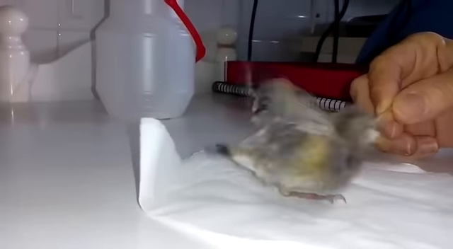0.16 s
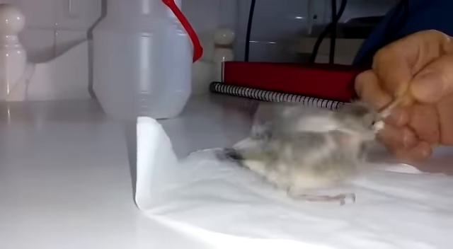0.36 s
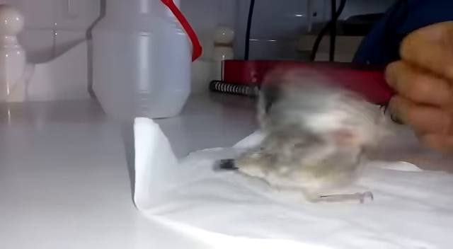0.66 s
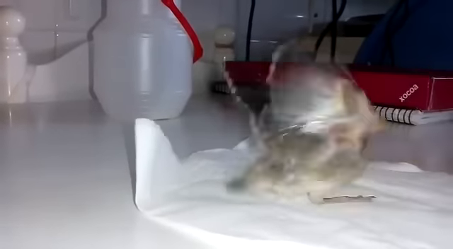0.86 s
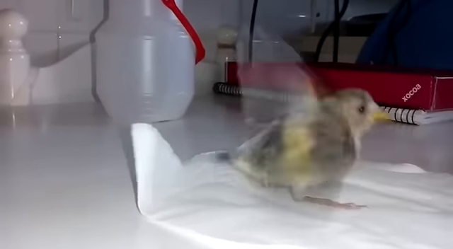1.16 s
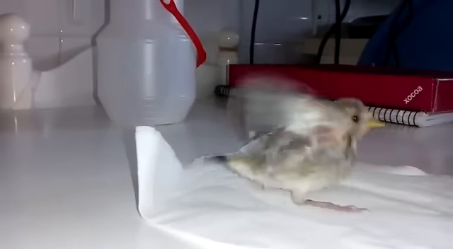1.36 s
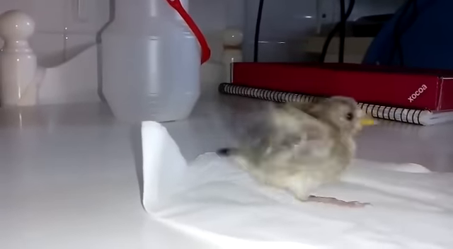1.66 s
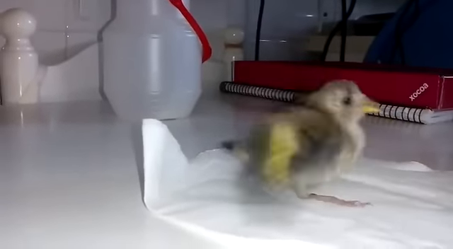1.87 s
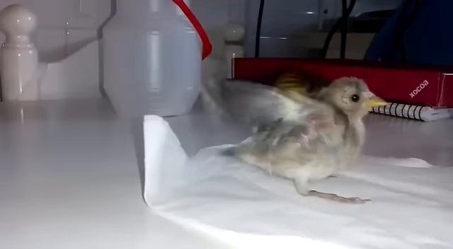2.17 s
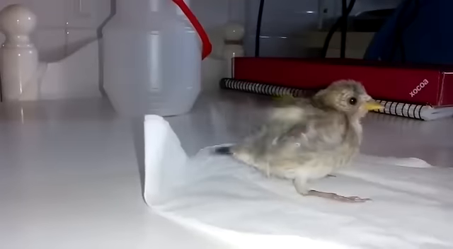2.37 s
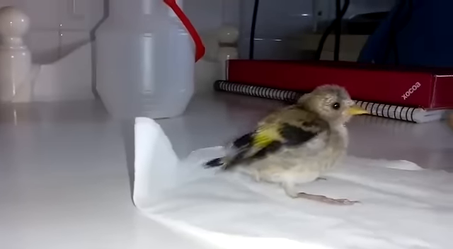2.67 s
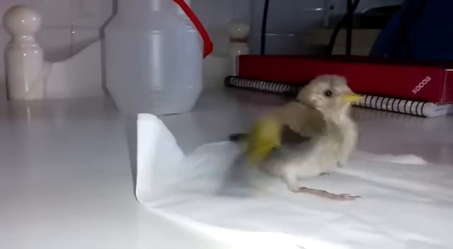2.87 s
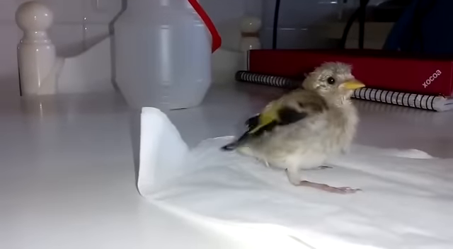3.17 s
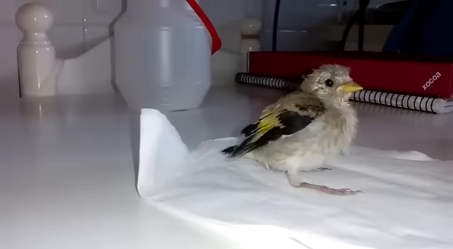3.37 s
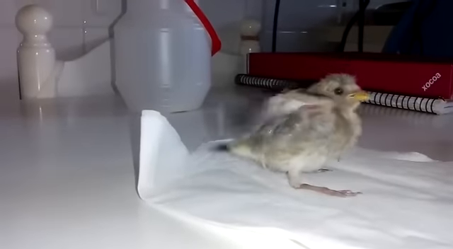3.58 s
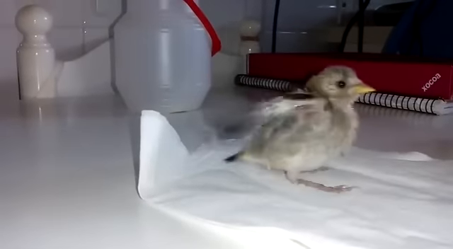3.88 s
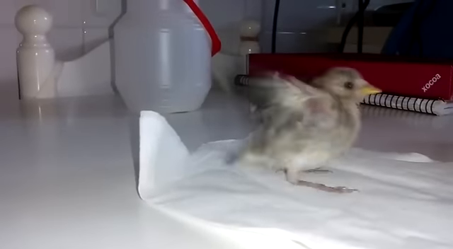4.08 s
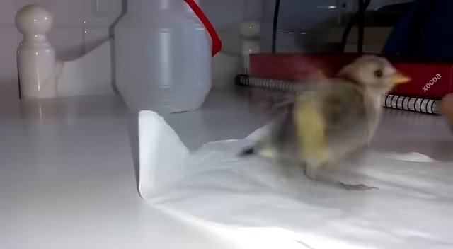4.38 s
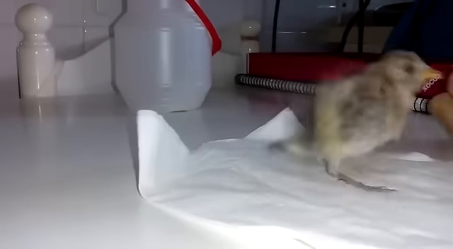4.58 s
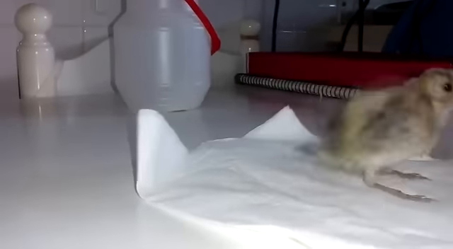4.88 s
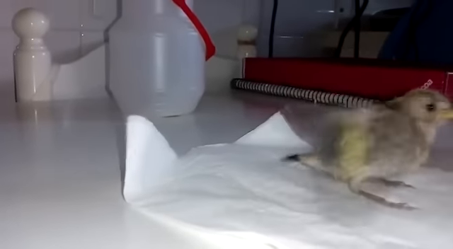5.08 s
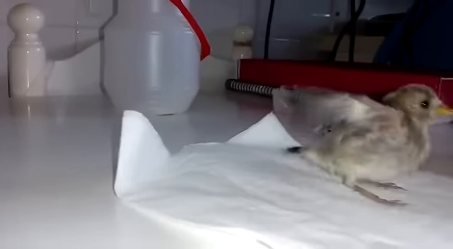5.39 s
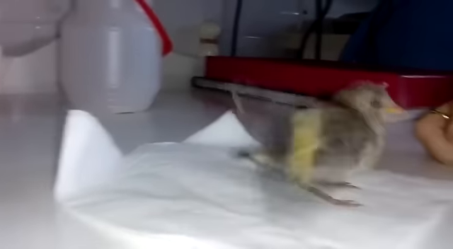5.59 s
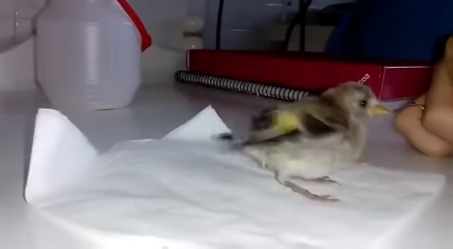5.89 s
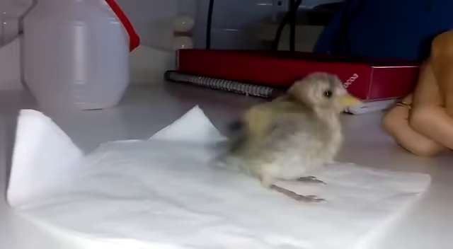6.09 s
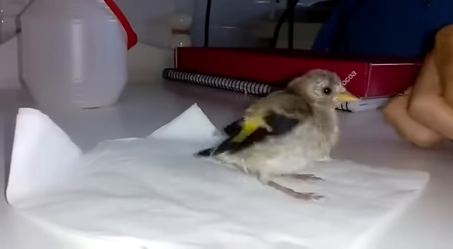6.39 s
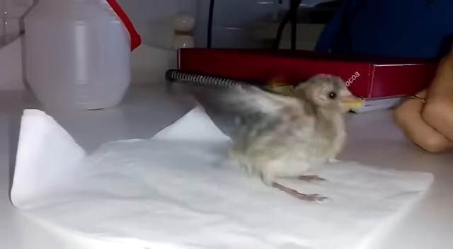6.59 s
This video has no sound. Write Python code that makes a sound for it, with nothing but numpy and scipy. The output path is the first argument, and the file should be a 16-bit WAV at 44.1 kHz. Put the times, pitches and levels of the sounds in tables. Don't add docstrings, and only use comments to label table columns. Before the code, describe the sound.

Steady soft air hum in a small bare room, with a young bird chirping loudly and very near. After an opening chirp fragment and a quiet stretch with light paper taps, bright split-second whistles come about every second, mostly in high-low pairs, with a burst of several past the middle. Dry ticks precede one pair; a thin feather swish comes later. Loudest peaks are slightly overdriven, and each chirp leaves a short hard echo.

```python
import sys
import numpy as np
from scipy import signal
from scipy.fft import rfft, irfft, next_fast_len
from scipy.io import wavfile
from scipy.ndimage import uniform_filter1d

SR = 44100
rng = np.random.default_rng(int(sys.argv[2]) if len(sys.argv) > 2 else 0)


def ratio(d):
    e = np.asarray(d, float) / 20
    return 10 ** e


def log_audio(samples):
    frames = np.atleast_2d(samples).T
    limited = np.clip(frames, -1, 1)
    pcm = np.round(limited * 32767).astype(np.int16)
    wavfile.write(sys.argv[1], SR, pcm)


N = 296793
LEAD = 4410


def evened(x):
    return x / np.sqrt(np.mean(x ** 2) + 1e-20)


def read(points, hz):
    f, value = np.transpose(points)
    return np.interp(np.log(hz + 1), np.log(f + 1), value)


def add(mix, start_s, sound):
    part = mix[LEAD + round(start_s * SR):][:len(sound)]
    part += sound[:len(part)]


# (multiple of the pitch, level/dB under the whistle)
OVERTONE_LEVELS = [(2, -24), (3, -9)]
# (f/Hz, level/dB)
BEAK_PASSAGE = [(5000, 0), (6000, 6.5), (7500, 16), (9500, -10.5), (11000, -48), (16000, -40)]
# (f/Hz, level/dB)
AIR_NOISE = [(3400, -13), (4000, -30.5), (6000, -22.5), (7000, -48)]
# (f/Hz, factor)
MEMBRANE_SHAKE = [(3400, 1.0), (5000, 1.3), (6000, .6), (6500, .8), (7200, .3), (8500, .3), (9500, .8)]
# (f/Hz, level/dB)
LOUDNESS_FLUTTER = [(3400, 2.2), (4200, 1.0), (5200, 0.7), (6500, 0.4), (7200, 0.2)]


def whistle(times_s, pitches_hz, levels_db, wobble=0.017, edge_s=.0012):
    t = np.arange(times_s[0] - edge_s, times_s[-1] + edge_s, 1 / SR)
    glide = np.interp(t, times_s, pitches_hz)
    glide = uniform_filter1d(uniform_filter1d(glide, size=70), size=70)
    chance = rng.standard_normal((3, 4096))[:, :len(t)]
    slow = signal.lfilter(*signal.butter(3, 700, fs=SR), chance[:2])
    shake = slow * np.sqrt(30) * read(MEMBRANE_SHAKE, glide)
    pitch = glide * (1 + wobble * shake[0])
    phase = 2 * np.pi * np.cumsum(pitch) / SR
    tone = np.sin(phase)
    for k, under_db in OVERTONE_LEVELS:
        audible = k * pitch < SR / 2
        tone += ratio(under_db + read(BEAK_PASSAGE, k * pitch)) * np.sin(k * phase) * audible

    throat = signal.butter(5, [3400, 10800], "band", fs=SR, output="sos")
    air = ratio(read(AIR_NOISE, glide)) * signal.sosfilt(throat, chance[2])
    air = 1.5 * signal.lfilter(*signal.butter(1, 6500, fs=SR), air)

    effort_db = uniform_filter1d(np.interp(t, times_s, levels_db), size=80)
    effort_db += read(LOUDNESS_FLUTTER, glide) * np.tanh(shake[1])
    level = ratio(np.minimum(effort_db, -3.2))
    fade = np.clip(np.minimum(t - t[0], t[-1] - t) / (2 * edge_s), 0, 1)
    return t[0], np.sqrt(2) * level * np.sin(fade * np.pi / 2) ** 2 * (tone + air)


def play(mix, gesture, notes):
    share, way, under_db = np.transpose(gesture)
    for start_s, length_s, first_hz, second_hz, level_db in notes:
        pitches_hz = first_hz + (second_hz - first_hz) * way
        add(mix, *whistle(start_s + length_s * share, pitches_hz, level_db + under_db))


# (start t/s, length t/s, first f/Hz, second f/Hz, level/dB)
CLIMB_GESTURE = [(0, 0.061, -13.5), (.45, .7, -7.5), (.99, .99, 2.5)]
CLIMB_NOTES = [
    (2.043, .016, 7800, 8430, -7),
    (2.9954, 0.0046, 7420, 8100, -25),
    (4.328, .012, 8100, 8800, -10),
    (6.129, .014, 7600, 8270, -7),
    (4.329, .009, 9300, 9900, -18.5),
    (3.7545, .003, 8200, 9050, -12),
]
ARCH_GESTURE = [(0, 0, -19), (.35, .85, -4), (.6, .99, -2), (.99, 0.37, -4)]
ARCH_NOTES = [
    (1.1752, .015, 8400, 9480, -7.5),
    (1.176, 0.016, 9750, 10600, -13),
    (3.755, .012, 9870, 10050, -20),
    (5.429, 0.0054, 9900, 9800, -28),
]
FALL_GESTURE = [(0, 0, -5.5), (.2, .25, -.5), (.45, .65, -4), (.75, .99, -1), (.99, 0.97, -5.5)]
FALL_NOTES = [
    (1.1862, 0.022, 8350, 7500, -6),
    (2.058, 0.017, 8270, 7390, -4.5),
    (3.0155, 0.0155, 8200, 7460, -2.5),
    (3.761, .0225, 8350, 7460, -2.5),
    (4.3405, .0155, 8600, 7110, -2),
    (5.435, 0.023, 8330, 7370, -3),
    (6.141, 0.019, 8340, 7335, -2),
]
DROOP_GESTURE = [(0, 0, 5.5), (.45, 0.67, -6.5), (.99, .99, -7.5)]
DROOP_NOTES = [
    (2.0676, 0.013, 8870, 8290, -7.5),
    (4.338, 0.023, 9900, 8550, -14),
    (5.4305, .005, 8900, 8300, -21),
    (4.468, .007, 8000, 6800, -21),
    (3.7575, .005, 9100, 8350, -14),
]
HOOK_GESTURE = [(0, 0, -1), (.6, .3, 0.5), (.99, .99, -4)]
HOOK_NOTES = [
    (1.208, .0055, 7450, 7870, -7),
    (2.076, .0055, 7500, 7900, -10),
    (3.031, 0.0038, 7490, 7800, -5),
    (3.783, 0.0061, 7500, 7750, -14),
    (4.355, .0045, 7380, 7667, -5.5),
    (5.456, .0045, 7320, 7850, -13),
    (6.1596, .0055, 7410, 7750, -9),
]


def high_chirps(mix):
    play(mix, CLIMB_GESTURE, CLIMB_NOTES)
    play(mix, ARCH_GESTURE, ARCH_NOTES)
    play(mix, FALL_GESTURE, FALL_NOTES)
    play(mix, DROOP_GESTURE, DROOP_NOTES)
    play(mix, HOOK_GESTURE, HOOK_NOTES)


STEP_GESTURE = [(0, 0.022, -17), (.3, 0.96, -5), (.65, .99, -2.5), (.99, 0.44, -11)]
STEP_NOTES = [(1.321, 0.004, 3200, 3030, -24), (1.5054, 0.015, 3330, 3148, -7),
              (2.196, .0155, 3580, 3144, -7.5), (2.402, 0.013, 3300, 3210, -8),
              (3.1473, .019, 3190, 3320, -7.5), (3.8987, 0.014, 3460, 3220, -12),
              (4.473, 0.012, 3300, 3216, -6), (4.646, 0.0094, 3386, 3114, -9),
              (4.864, 0.01, 3300, 3200, -13), (5.588, 0.015, 3150, 3340, -9.5),
              (6.3082, 0.013, 3670, 3262, -8)]
OCTAVE_GESTURE = [(0, 0.18, -18), (.35, 0.85, -0.5), (.65, .9, -11), (.99, 1, -12)]
OCTAVE_NOTES = [
    (2.198, .0105, 6580, 6220, -18),
    (3.154, .0085, 6200, 6760, -14),
    (3.902, 0.008, 6700, 6400, -17),
    (4.472, 0.014, 6870, 6300, -7.5),
    (4.6464, .0085, 6030, 6260, -5.5),
    (4.865, .009, 6250, 6600, -9),
    (5.588, .014, 6280, 6560, -11.5),
    (6.313, 0.007, 6760, 6420, -12),
]
SLIDE_GESTURE = [(0, 0, -5.5), (.45, .55, -1.5), (.99, 1, -3.5)]
SLIDE_NOTES = [(-.06, .02, 3490, 4780, -10), (1.3205, .014, 3840, 4350, -16.5),
               (1.516, .006, 4050, 4450, -17), (2.208, .005, 3700, 4400, -18.5),
               (2.411, .008, 3297, 4500, -9.5), (3.159, .005, 3650, 4300, -21.5),
               (3.904, .007, 4220, 4350, -13), (4.484, .008, 4000, 4400, -19),
               (4.6585, .0065, 4300, 4550, -7), (4.864, .005, 4570, 5600, -26),
               (4.872, .009, 3500, 4300, -18), (5.594, .004, 3700, 4300, -21.5),
               (6.316, .004, 3800, 4400, -26)]
RISE_GESTURE = [(0, 0.0083, -5.5), (.2, .5, -2.5), (.45, 0.816, -0.9), (.75, .99, -7), (.99, 0.88, -8.5)]
RISE_NOTES = [
    (1.335, 0.018, 4380, 4944, -4),
    (1.522, 0.016, 4500, 4800, -5),
    (2.213, 0.014, 4370, 4740, -3.5),
    (2.4175, 0.015, 4596, 5100, -5.5),
    (3.166, .016, 4410, 4800, -4),
    (3.915, 0.012, 4285, 4685, -2.5),
    (4.493, .014, 4300, 4770, -3),
    (4.665, 0.015, 4550, 5050, -2),
    (5.601, 0.013, 4350, 4720, -7),
    (6.321, 0.021, 4510, 4935, -6.5),
]
FLICK_GESTURE = [(0, 0.087, 0), (.45, .45, -0.5), (.99, 1, -7)]
FLICK_NOTES = [(-.05, .02, 7200, 9260, -12), (1.319, 0.023, 7700, 9530, -18),
               (1.337, 0.0145, 4900, 5750, -12.5), (1.517, .013, 8240, 9360, -18.5),
               (1.523, 0.0114, 4990, 5860, -15), (2.212, 0.016, 4850, 6320, -16.5),
               (2.4135, 0.006, 7200, 9100, -18), (2.4259, 0.01, 5580, 6200, -15),
               (3.171, 0.0092, 5300, 6440, -16), (3.917, 0.0142, 4740, 6340, -16),
               (4.491, 0.01, 4790, 5800, -10), (4.6634, .013, 4810, 6250, -10.5),
               (4.872, .005, 6900, 8600, -14), (4.482, .012, 8000, 9200, -25.5),
               (4.654, .012, 8000, 9230, -23.5), (2.209, .013, 8450, 9400, -25),
               (4.879, 0.013, 6450, 7400, -7), (5.6055, .004, 5000, 6500, -17),
               (5.61, .006, 5100, 6500, -18), (5.6, .004, 8600, 9050, -26), (3.162, .004, 8300, 8900, -26),
               (6.323, 0.018, 5150, 6400, -12.5), (6.325, .012, 6100, 7100, -26),
               (6.32, .012, 8800, 9870, -31), (3.905, .015, 7900, 9200, -29)]
TRAIL_GESTURE = [(0, 0, -1), (.5, .5, -2), (.99, .99, -5)]
TRAIL_NOTES = [
    (3.184, .01, 4760, 4700, -17),
    (3.197, .007, 4800, 4740, -15),
    (3.927, .012, 4700, 4620, -15),
    (3.945, .004, 4680, 4640, -19),
    (5.615, .011, 4680, 4650, -15),
    (5.628, .015, 4660, 4640, -17),
]


def low_chirps(mix):
    play(mix, STEP_GESTURE, STEP_NOTES)
    play(mix, OCTAVE_GESTURE, OCTAVE_NOTES)
    play(mix, SLIDE_GESTURE, SLIDE_NOTES)
    play(mix, RISE_GESTURE, RISE_NOTES)
    play(mix, FLICK_GESTURE, FLICK_NOTES)
    play(mix, TRAIL_GESTURE, TRAIL_NOTES)


HOLD_GESTURE = [(0, 0, -7.5), (.2, .82, -1.5), (.5, 0.99, 0.5), (.75, .97, -2), (.99, .4, -10.5)]
HOLD_NOTES = [
    (-.031, .03, 5750, 6060, -3),
    (3.0, .012, 8450, 9050, -12),
    (3.001, .016, 9700, 10250, -20),
    (4.8765, .027, 5500, 6230, -2),
]


def held_notes(mix):
    play(mix, HOLD_GESTURE, HOLD_NOTES)


SQUEAK_GESTURE = [(0, 0.15, -6.5), (.45, .6, -1), (.99, .99, -4)]
SQUEAK_NOTES = [(1.311, .005, 7200, 8250, -23), (1.495, 0.012, 7350, 8100, -35),
                (2.035, 0.0049, 7400, 7315, -35), (2.188, 0.0087, 6830, 8300, -25),
                (2.39, 0.013, 7100, 7400, -25.5), (2.989, .007, 8000, 7350, -30),
                (3.1395, .01, 7050, 8030, -22), (3.745, .006, 7700, 8400, -37),
                (3.891, .009, 6600, 7800, -25), (4.317, .006, 7700, 8200, -30),
                (4.3245, .004, 7700, 7950, -17), (4.462, .007, 6930, 8040, -23.5),
                (4.634, .012, 6900, 7800, -28), (4.851, 0.008, 8000, 7250, -27),
                (4.859, .005, 7250, 6200, -18), (5.5755, .003, 6700, 7200, -25),
                (5.58, 0.009, 7600, 7000, -23), (6.119, 0.008, 7600, 6780, -32),
                (6.298, .012, 6300, 7550, -24)]


def starting_squeaks(mix):
    play(mix, SQUEAK_GESTURE, SQUEAK_NOTES)


BEAT_GESTURE = [(0, 0, -5.5), (.45, 0.3, -0.5), (.99, .99, -11)]
BEAT_NOTES = [
    (4.345, .011, 6050, 5800, -15.5),
    (2.402, .007, 5000, 4600, -27),
    (3.7635, .005, 6600, 6400, -25),
    (3.7635, .005, 3400, 3200, -30),
    (2.065, .006, 5300, 5200, -25),
    (2.065, .006, 6400, 6300, -28),
    (1.323, .012, 12000, 13200, -48),
    (1.515, .008, 12500, 13500, -47),
    (1.192, .015, 15450, 14700, -46),
]


def extra_tones(mix):
    play(mix, BEAT_GESTURE, BEAT_NOTES)


# (grip t/s, hold t/s, deepest level/dB)
DUCKINGS = [(1.19, .05, -7), (1.338, .01, -3), (2.062, .042, -9), (2.22, .016, -2), (3.006, .044, -9),
            (3.762, .042, -13), (4.335, .047, -11), (4.49, .015, -3), (4.66, .036, -4), (4.87, .06, -8),
            (5.432, .052, -12), (6.142, .043, -19)]


def ducking_db():
    t, gain_db = np.arange(N) / SR, np.zeros(N)
    for grip_s, hold_s, deep_db in DUCKINGS:
        times_s = [0, .4 * hold_s, hold_s, hold_s + .009]
        gain_db += np.interp(t - grip_s, times_s, [0, deep_db, .7 * deep_db, 0])
    return gain_db


# (f/Hz, time to fall by 60 dB t/s)
WALL_RINGING = [(3200, 0.27), (4500, 0.27), (6600, 0.29), (10000, 0.3)]
# (f/Hz, level/dB)
WALL_STRENGTH = [(2500, -29), (3300, -13.5), (4000, -1), (4350, -5), (4650, -7), (5000, -7.5), (5500, -5),
                 (6500, -9.5), (7500, -7), (8500, -11), (10000, -10)]


def wall_pattern(onset_s=0.014):
    taps = np.zeros(SR // 2)
    at = np.arange(0, SR // 2 - 20, 20)
    taps[at + rng.integers(0, 20, len(at))] = rng.choice([-1., 1.], len(at))
    taps *= np.clip(np.arange(SR // 2) / SR / onset_s - .5, 0, 1)
    hz, t, z = signal.stft(taps, SR, nperseg=256)
    t60 = read(WALL_RINGING, hz)[:, None]
    decay = ratio(read(WALL_STRENGTH, hz)[:, None] - 60 * t / t60) / np.sqrt(t60)
    tail = signal.istft(z * decay, SR, nperseg=256)[1]
    return tail / np.sqrt(SR / 20 / (6 * np.log(10)))


# (delay t/s, level/dB)
NEAR_ECHOES = [
    (.0011, -43),
    (.0042, -12),
    (.009, -12),
    (0.019, -18),
    (0.028, -47),
]


def room(x):
    turn = 2 * np.pi * np.arange(len(x)) / SR / 2.3
    out = np.zeros(len(x))
    for share in (np.sin(turn), np.cos(turn)):
        out += signal.fftconvolve(x * share, wall_pattern())[:len(x)]
    for delay_s, level_db in NEAR_ECHOES:
        delay = round(delay_s * SR)
        out[delay:] += ratio(level_db) * x[:len(x) - delay]
    return out


# (t/s, peak level/dB, ring f/Hz, sharp edge level/dB)
PAPER_TICKS = [
    (.206, -27, 2300, -44),
    (.2468, -20, 1900, -37),
    (.25, -18, 2200, -35),
    (.253, -22, 700, -44),
    (2.785, -23, 3000, -40),
    (2.8515, -17, 1900, -40),
    (2.9432, -13, 2500, -23),
    (1.1893, -19, 4500, -29),
    (3.7655, -22, 4500, -27),
]


def paper_ticks(mix):
    t = np.arange(300) / SR
    for start_s, peak_db, hz, edge_db in PAPER_TICKS:
        knock = ratio(peak_db) * np.sin(2 * np.pi * hz * t) * np.exp(-t * hz / 1.1) * 1.5
        snap = signal.lfilter(*signal.butter(2, 11000, fs=SR), rng.standard_normal(300))
        add(mix, start_s, knock + ratio(edge_db) * snap * np.exp(-t / 0.00071))


# (start t/s, length t/s, level/dB)
FEATHER_BRUSHES = [
    (1.09, .08, -60),
    (2.87, .07, -61),
    (5.04, .04, -58),
    (5.2, .23, -55),
    (5.7, .08, -62),
]


def feather_rustles(mix):
    band = signal.butter(4, (8600, 11400), "band", fs=SR, output="sos")
    for start_s, length_s, level_db in FEATHER_BRUSHES:
        size = round(length_s * SR)
        grain = rng.standard_normal((2, 12000))
        streaks = ratio(3.0 * evened(uniform_filter1d(grain[1, :6001], size=40)))
        x = signal.sosfilt(band, irfft(rfft(grain[0]) * streaks)[:size])
        swell = np.sin(np.pi * (np.arange(size) / size) ** 1.6) ** .7
        add(mix, start_s, ratio(level_db) * evened(x) * swell)


# (f/Hz, level/dB per Hz)
HUM_COLOUR = [(12, -64), (20, -19), (27, -21), (42, -3.5), (59, 0), (283, -2.5), (368, -5.5), (431, -6),
              (623, -6.5), (710, -8.5), (1330, -10), (3170, -19.5), (6440, -22.5), (8150, -40.5),
              (10600, -39), (13800, -61), (22000, -120)]
# (t/s, level/dB)
HUM_LOUDNESS = [
    (0.0, -31),
    (2.5, -32.5),
    (4.6, -34),
    (6.73, -34.5),
]


def hum(patchy_db=0.94, swell_db=0.8):
    frames, hz = N // 256 + 5, np.fft.rfftfreq(1024, 1 / SR)
    a, b, patches = rng.standard_normal((frames, 513, 3)).T
    patches = uniform_filter1d(uniform_filter1d(patches, size=10, axis=0), size=10, axis=1)
    patches = evened(patches)
    t = np.arange(frames) * 256 / SR
    swell = np.zeros(frames)
    for f in np.geomspace(2, 20, 24):
        swell += np.sin(2 * np.pi * (f * t + rng.random())) / np.sqrt(f)
    shape_db = read(HUM_COLOUR, hz)[:, None] + patchy_db * patches + swell_db * evened(swell)
    z = (a + 1j * b) * ratio(shape_db)
    noise = evened(signal.istft(z, nperseg=1024, noverlap=768)[1][:N])
    return noise * ratio(0.54 + np.interp(np.arange(N) / SR, *np.transpose(HUM_LOUDNESS)))


def hiss():
    grain, drift = rng.standard_normal((2, N))
    drift = evened(uniform_filter1d(uniform_filter1d(drift, size=1300), size=1300))
    return grain * ratio(-58.3 + 1.3 * drift + .6 * ducking_db())


def scene():
    bird, close = np.zeros((2, N + LEAD))
    high_chirps(bird)
    low_chirps(bird)
    held_notes(bird)
    starting_squeaks(bird)
    bird = signal.sosfilt(signal.butter(6, [2800, 11300], "band", fs=SR, output="sos"), bird)
    extra_tones(close)
    paper_ticks(close)
    feather_rustles(close)
    walls = room(bird)[LEAD:] * ratio(0.37 * ducking_db())
    background = hum() * ratio(ducking_db()) + hiss()
    return ((bird + close)[LEAD:] + walls + background)[None]


def roll_off(x):
    return signal.sosfilt(signal.butter(12, 15500, fs=SR, output="sos"), x)


def record(dry):
    x = signal.lfilter(*signal.butter(3, 46, "high", fs=SR), dry)
    size = uniform_filter1d(abs(signal.hilbert(x, next_fast_len(N))[:, :N]), size=40)
    ceiling_db, squeeze = -0.5, 0.51
    x = x / np.maximum(size / ratio(ceiling_db), 1) ** squeeze
    return roll_off(np.clip(x, -1, 1))


dry = scene()
out = record(dry)
log_audio(out)
```